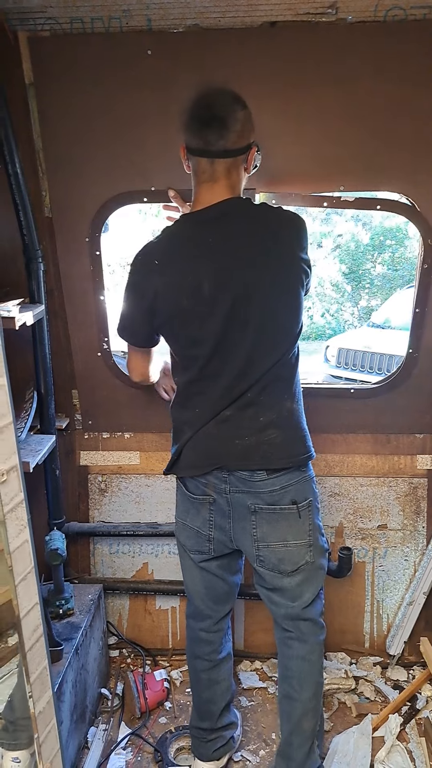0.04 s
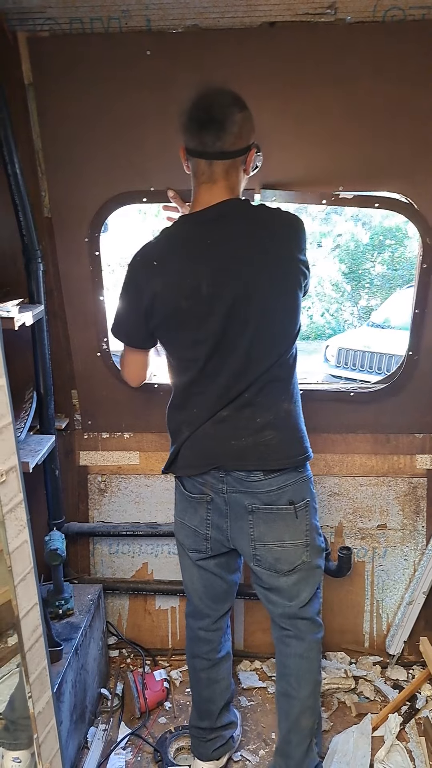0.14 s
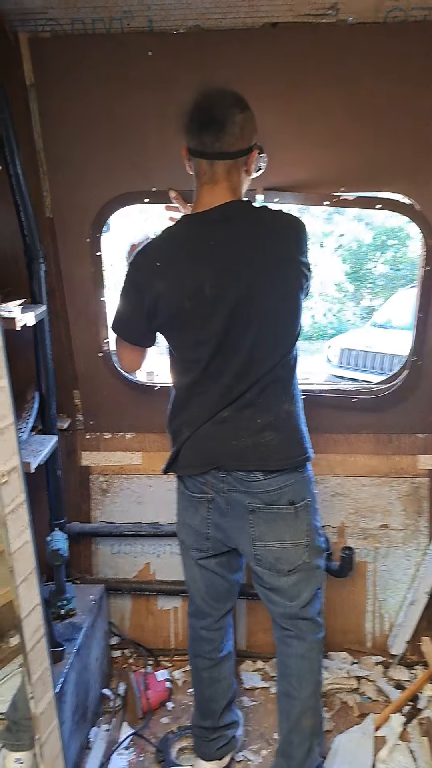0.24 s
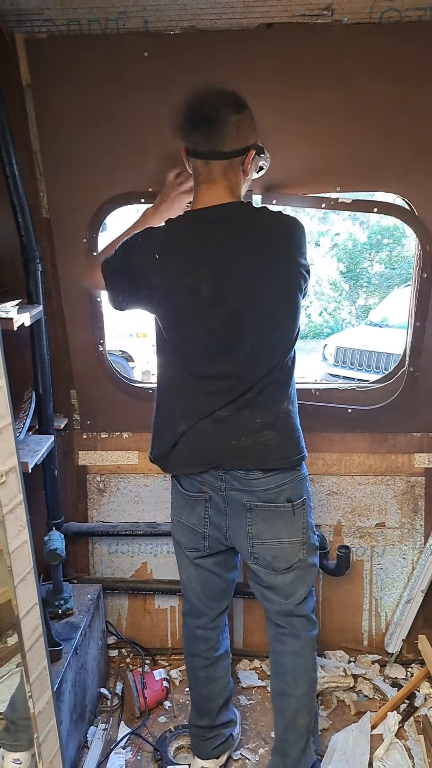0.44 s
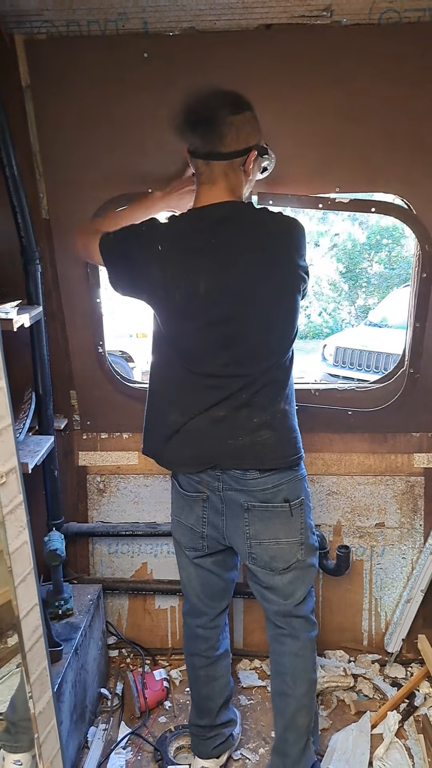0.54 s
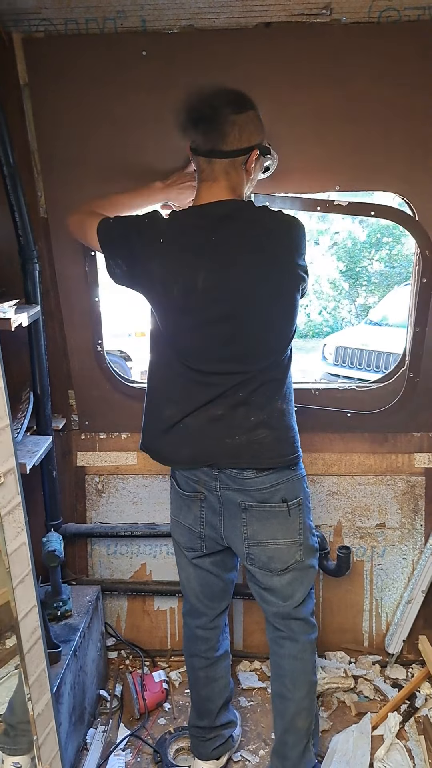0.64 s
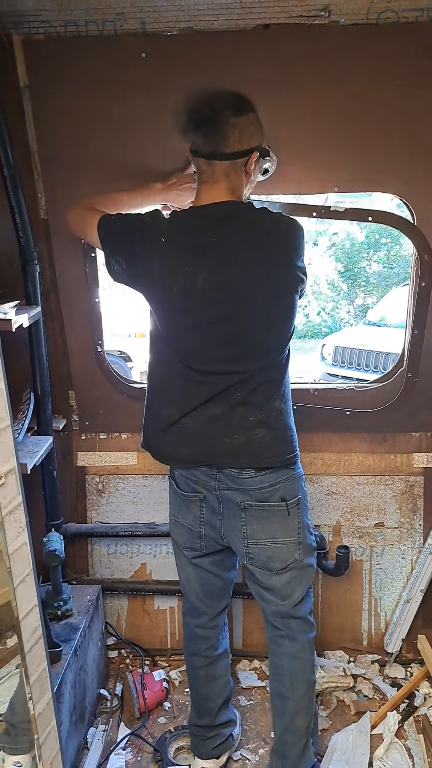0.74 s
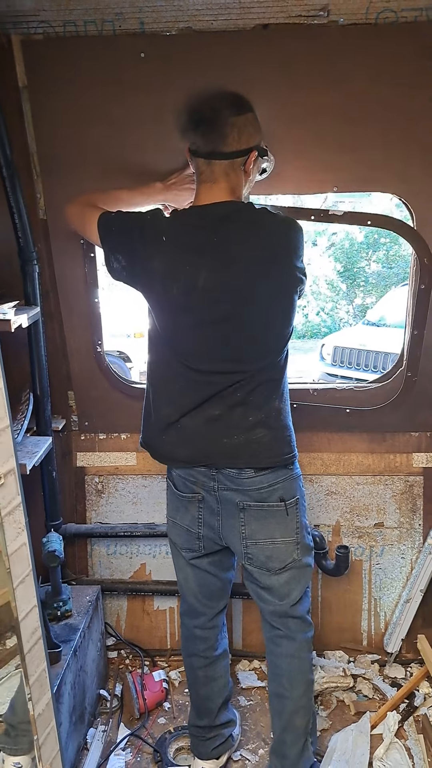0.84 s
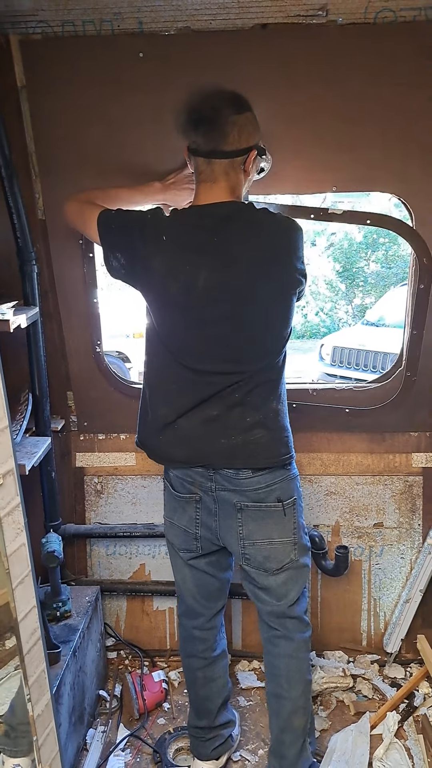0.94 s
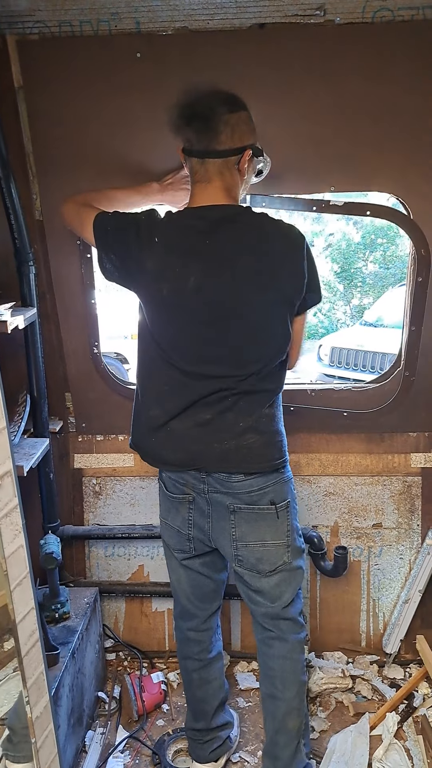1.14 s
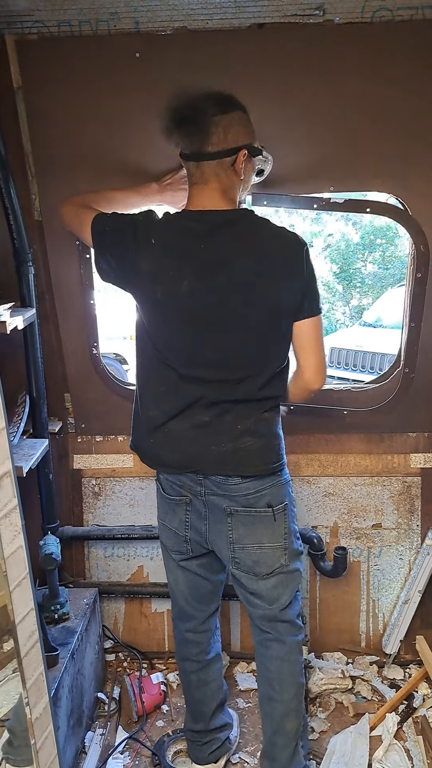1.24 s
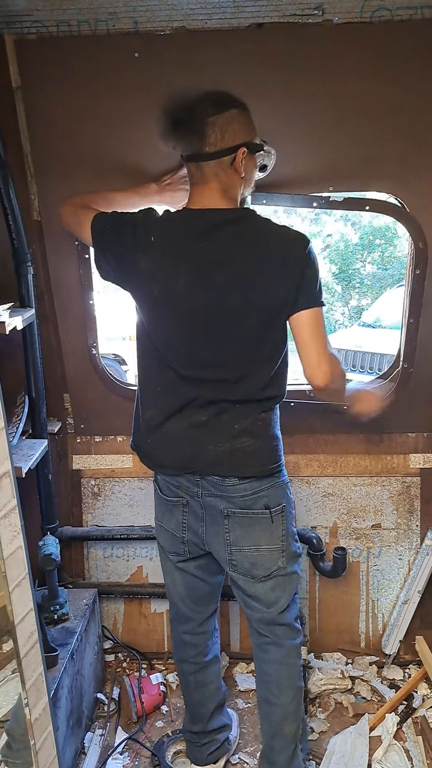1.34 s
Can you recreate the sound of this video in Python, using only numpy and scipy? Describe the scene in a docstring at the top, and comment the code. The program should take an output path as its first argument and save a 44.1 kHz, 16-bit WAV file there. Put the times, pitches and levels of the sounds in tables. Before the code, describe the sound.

A window frame knocks twice against a wooden wall, then a hand rubs the panel.

```python
"""A window frame knocks twice, dull and then sharp, as it is pushed into a wood-panelled wall.
Each impact excites damped normal modes: the panel booms and the metal frame rings on,
while the wall and the small bare room reverberate. A hand then rubs along the panel;
sliding friction makes a hiss, and the panel shudders and briefly sings.
A few small ticks of the settling frame sound over the quiet air of the room."""
import sys
import numpy as np
from scipy import signal
from scipy.fft import rfft, irfft
from scipy.io import wavfile

SR = 44100
rng = np.random.default_rng(int(sys.argv[2]) if len(sys.argv) > 2 else 0)


def waveform_to_disk(signal):
    """Save audio, clipped to [-1, 1], as 16-bit WAV at the path in sys.argv[1]."""
    frames = np.transpose(np.atleast_2d(signal))
    scaled = np.clip(frames, -1, 1) * 32767
    samples = np.round(scaled).astype(np.int16)
    wavfile.write(sys.argv[1], SR, samples)


N = 61739
TIME = np.arange(N) / SR
HZ = np.fft.rfftfreq(N, 1 / SR)
PANEL_SPREAD_RAD, PANEL_PAN_DB = 0.18, -1

# Stereo balance of the impacts and of the quieter noises: (frequency [Hz], left minus right [dB])
IMPACT_PAN = [(60, 2.5), (120, 2.5), (260, -3), (450, -4.5), (700, -4), (2000, -5), (4500, 1), (6300, -2),
              (8000, -11), (12000, 11.5), (16000, -4.5)]
QUIET_PAN = [(60, -2), (250, 0), (1000, -3.5), (3000, -0.5), (5500, 1.5), (7500, -14), (10000, 8),
             (16000, 2.5)]


def amp(db):
    """Amplitude ratio of a level in decibels."""
    return 10 ** (np.asarray(db) / 20)


def unit(x):
    """Normalisation to rms 1."""
    return x / np.sqrt(np.mean(x ** 2) + 1e-20)


def spectrum(points):
    """Interpolation of a table over logarithmic frequency."""
    hz, value = np.transpose(points)
    return np.interp(np.log(HZ + 1), np.log(hz + 1), value)


def contour(points):
    """Linear interpolation of a table over time."""
    return np.interp(TIME, *np.transpose(points))


def sides(pan_db):
    """Left and right gains for an interchannel level difference."""
    return amp(np.array([[.5], [-.5]]) * pan_db)


def wander(seconds):
    """Random fluctuation of rms 1: noise low-passed at 1 / seconds."""
    return unit(irfft(rfft(rng.standard_normal(N)) / (1 + (HZ * seconds) ** 2), N))


def add(mix, onset_s, sound):
    """Superposition of a delayed sound on the mix."""
    start = max(round(onset_s * SR), 0)
    mix[:, start:] += sound[:, :N - start]


def noise(colour_db, pan):
    """Random-phase stereo noise of rms 1, coherent between channels only at long wavelengths."""
    # Interchannel coherence, before clipping to 1: (frequency [Hz], coherence [ratio])
    likeness = [(40, 1.4), (120, 1.1), (250, 0.8), (500, 0.37), (1000, 0.12), (2000, 0), (5000, 0),
                (16000, 0)]
    coherence = np.clip(spectrum(likeness), -1, 1)
    phasors = np.exp(2j * np.pi * rng.random((2, len(HZ))))
    mid, side = phasors[0] * np.sqrt(1 + coherence), phasors[1] * np.sqrt(1 - coherence)
    channels = np.array([mid + side, mid - side])
    return unit(irfft(channels * amp(colour_db) * sides(spectrum(pan)), N))


def room_ripple(depth_db=4, spacing_hz=44.87, corner_hz=1400):
    """Interference in the room leaves random treble peaks and dips, in dB for each channel."""
    bins = np.arange(len(HZ))
    peaks = [np.interp(HZ / spacing_hz, bins, rng.standard_normal(len(HZ))) for _ in range(2)]
    return depth_db * HZ ** 2 / (HZ ** 2 + corner_hz ** 2) * np.array(peaks)


def ring(rise_s, t60):
    """Envelope of a damped resonance: build-up, then exponential decay by 60 dB in t60 seconds."""
    return (1 - np.exp(-TIME / rise_s)) * np.exp(-np.log(1000) * TIME / t60)


def modes(table, rise_s, spread_rad, pan_db):
    """Normal modes: damped sinusoids, each reaching the two channels in different phase."""
    out = np.zeros((2, N))
    for hz, db, t60 in table:
        phase = np.array([[1], [-1]]) * spread_rad * rng.uniform(.5, 1) * rng.choice([-1, 1])
        out += amp(db) * ring(rise_s, t60) * np.sin(2 * np.pi * hz * TIME + phase)
    return out * sides(pan_db)


def struck(table, hardness):
    """Modal excitation: the hardness of a blow sets each mode between its soft and hard level."""
    return [(hz, soft + hardness * (hard - soft), t60) for hz, soft, hard, t60 in table]


def knocks():
    """Impulse response: each blow excites diffuse reverberation and the modes of panel and frame."""
    # Impacts: (time [s], reverberation level [dB], hardness [0-1], modal level [dB])
    blows = [(0.2449, -25.5, 0.17, -31.5), (.329, -26, 0.98, -44.5), (0.3326, -20.5, 0.94, -31)]
    # Spectra of a soft and of a hard blow: (frequency [Hz], level [dB])
    dull = [(30, -28), (60, -16), (130, -10), (240, -1), (400, -3), (490, -1), (600, -5), (700, 2.5),
            (850, -4), (1050, -19), (1500, -17), (2400, -12), (3400, -22), (5000, -23.5), (7200, -16.5),
            (9200, -37), (13000, -46), (16000, -57.5)]
    sharp = [(30, -24), (60, -3), (130, -7), (270, -11), (390, -0.5), (490, -3.5), (700, -4), (850, -4.5),
             (1150, -18), (1700, -13.5), (2000, -10), (2600, -5.5), (3500, -9), (5400, -6.5), (5950, -11.5),
             (6500, -7), (7400, -5.5), (8300, -12), (9200, -18.5), (11600, -16), (16000, -22)]
    # Reverberant bands of wall and room: (frequency [Hz], build-up [s], t60 [s])
    wall_bands = [(49.9, 0.072, .9), (124, 0.0075, 0.89), (300, 0.002, 0.51), (649, 0.011, 0.19),
                  (1290, 0.0028, 0.44), (2410, 0.0014, 0.24), (4960, 0.0023, 0.19), (8000, 0.0025, 0.18),
                  (15000, .0015, 0.17)]
    # Modes of wood and metal: (frequency [Hz], soft-blow level [dB], hard-blow level [dB], t60 [s])
    panel_modes = [(55.4, -7, -5, 0.746), (110.4, -14.5, -12.5, 0.72), (125, 2.5, -17, 0.64),
                   (160.4, -6, -4, .3), (233.1, 6.5, -1, 0.23), (292.5, -4, -5.5, 0.24),
                   (368, 4, -12, 0.24), (383.7, -3, -5, .3), (405.3, -13.5, -2.5, .4),
                   (439, -3, -1.5, 0.48), (529, -7, -4, 0.2), (565.5, -15, -10.5, 0.6),
                   (680.8, 3.5, 6, 0.12), (690.7, 1.5, 4, 0.16), (727.8, 9, -5, 0.12),
                   (799.3, -4.5, -8, 0.22), (840, -10, -18, 0.24)]
    frame_modes = [(1084, -28.5, -18.5, 1.3), (1211, -17.5, -13, 1.74), (1405, -21, -9, .82),
                   (1450, -21.5, -8.5, 0.59), (1545, -17, -14.5, 1.5), (1710, -10.5, -19, .28),
                   (1906, -19, -11, .22), (1955, -20, -4, 0.36), (2392, -13, 0.5, .25),
                   (2445, -11.5, -10.5, .22), (2840, -19.5, -4.5, 0.218), (3208, -22, -12, .21),
                   (4270, -22, 1.5, 0.196), (4740, -21.5, -5.5, 0.14), (6620, -20, -3.5, .15),
                   (7390, -17.5, 0, 0.19)]
    out, ripple_db = np.zeros((2, N)), room_ripple()
    centres_hz = [hz for hz, _, _ in wall_bands]
    for onset, db, hardness, modes_db in blows:
        colour_db = (1 - hardness) * spectrum(dull) + hardness * spectrum(sharp) + ripple_db
        blow = rfft(noise(colour_db, IMPACT_PAN))
        for (_, rise_s, t60), weights in zip(wall_bands, np.eye(len(wall_bands))):
            band = spectrum(list(zip(centres_hz, weights)))  # overlapping bands that sum to 1
            add(out, onset, amp(db) * irfft(blow * band, N) * ring(rise_s, t60))
        wood = modes(struck(panel_modes, hardness), rise_s=0.0051,
                     spread_rad=PANEL_SPREAD_RAD, pan_db=PANEL_PAN_DB)
        metal = modes(struck(frame_modes, hardness), rise_s=0.0019, spread_rad=1.347, pan_db=-3.5)
        add(out, onset, amp(modes_db) * (wood + metal))
    return out


def cracks(half_width_octaves=0.58):
    """Contact transients: the frame meets the wall at several points within milliseconds."""
    # Contacts: (time [s], level [dB], centre frequency [Hz], time to peak [s])
    contacts = [(0.2446, -29, 600, 0.0014), (0.2448, -41, 4000, 0.00057), (0.2497, -39, 3200, 0.00063),
                (0.2524, -33, 3200, 0.00045), (0.2554, -29, 680, 0.0031), (0.3333, -20, 11000, 0.0004),
                (.334, -29, 720, 0.00078), (.3342, -13.5, 4900, 0.00044), (0.3377, -21, 5450, 0.00046),
                (0.342, -30.5, 700, 0.0046)]
    out = np.zeros((2, N))
    for onset, db, hz, peak_s in contacts:
        colour_db = -6 * (np.log2((HZ + 1) / hz) / half_width_octaves) ** 2
        age = TIME / peak_s
        add(out, onset, amp(db) * noise(colour_db, IMPACT_PAN) * age * np.exp(1 - age))
    return out


def bumps():
    """Free vibration: each soft bump of the settling panel rings in one damped mode."""
    # Bumps: (time [s], level [dB], frequency [Hz], t60 [s])
    soft_impacts = [(0.127, -39, 168.4, .1), (.16, -39.5, 168, 0.12), (.392, -28.5, 255, 0.127),
                    (0.409, -37, 108, 0.38), (0.444, -28.5, 110.4, 0.33), (0.529, -42, 337, 0.2),
                    (.657, -27.5, 265, 0.044), (0.728, -27.5, 256.3, 0.064), (0.736, -44, 324.5, 0.47),
                    (.8, -45, 318, 0.44)]
    out = np.zeros((2, N))
    for onset, db, hz, t60 in soft_impacts:
        bump = modes([(hz, db, t60)], rise_s=0.0043, spread_rad=PANEL_SPREAD_RAD, pan_db=PANEL_PAN_DB)
        add(out, onset, bump)
    return out


def rubbing(start_s=0.544, end_s=1.026, blend_s=0.098):
    """Sliding friction makes a grainy hiss: light brushing, and one firm stroke that brightens."""
    # Friction envelope: (time [s], level [dB])
    hiss_level = [(0, -57), (.11, -56), (.17, -51.5), (.235, -71), (.42, -70), (.465, -51), (.52, -62.5),
                  (.565, -63), (.605, -55.5), (.645, -56.5), (.73, -47), (.81, -44), (.91, -49), (1.0, -60),
                  (1.045, -58.5), (1.1, -73.5), (1.2, -80), (1.3, -73), (1.33, -62.5), (1.4, -81)]
    # Spectra of light and of firm rubbing: (frequency [Hz], level [dB])
    light_colour = [(880, -56.5), (1500, -25), (1900, -26), (3550, -15), (4830, -5.5), (5710, -8.5),
                    (6500, 0), (7690, -2), (9470, -14.5), (12000, -7.5), (16000, -10)]
    firm_colour = [(400, -25), (600, -11.5), (950, -3), (1300, -17), (2000, -7.5), (2800, -11),
                   (4500, -7.5), (5000, 1), (5400, -5.5), (6000, -6.5), (7400, -1.5), (8200, -7.5),
                   (9300, -18.5), (10500, -11.5), (16000, -11)]
    ripple_db = room_ripple()
    stroke = noise(spectrum(firm_colour) + ripple_db, QUIET_PAN)
    treble_hz, rise_db_per_s, rise_centre_s = 9350, 38, .82
    treble = irfft(rfft(stroke) / (1 + (treble_hz / (HZ + 1)) ** 8), N)
    treble_gain = amp(rise_db_per_s * np.clip(TIME - rise_centre_s, -.15, .15))
    stroke = stroke + treble * (treble_gain - 1)
    brushing = noise(spectrum(light_colour) + ripple_db, QUIET_PAN)
    # Equal-power crossfade into the firm stroke and out again
    firmness = np.clip(.5 + np.minimum(TIME - start_s, end_s - TIME) / blend_s, 0, 1)
    hiss = np.sqrt(firmness) * stroke + np.sqrt(1 - firmness) * brushing
    grain_db = 0.85 * wander(seconds=0.00087)
    return hiss * amp(contour(hiss_level) + grain_db)


def pushed_panel(sing_hz=375.5, waver_ratio=0.0083):
    """Forced vibration: under the hand the panel flexes, shudders and sings one wavering note."""
    # Envelopes of slow flexing, shudder and note: (time [s], level [dB])
    flex_level = [(0, -56), (.22, -53.5), (.37, -47.5), (.46, -55), (.55, -42), (.61, -73), (.7, -46),
                  (.85, -56), (.94, -43.5), (1.01, -48.5), (1.08, -46), (1.15, -60), (1.4, -61.5)]
    shudder_level = [(0, -65), (.11, -66), (.135, -52), (.19, -55.5), (.23, -58.5), (.4, -37.5),
                     (.55, -49.5), (.6, -53.5), (.7, -47), (.74, -48), (.84, -46), (.94, -49),
                     (1.08, -56.5), (1.2, -62), (1.4, -65.5)]
    sing_level = [(0, -88.5), (.5, -68.5), (.66, -50.5), (.8, -60), (.92, -51.5), (1.02, -48.5),
                  (1.14, -51), (1.21, -62), (1.4, -73)]
    # Spectra of flexing and shudder: (frequency [Hz], level [dB])
    flex_colour = [(15, -44), (27, -26), (40, 0.5), (58, -3.5), (80, -13), (120, -23), (250, -49)]
    shudder_colour = [(50, -43), (90, -4), (130, 3), (165, -8.5), (230, 0.5), (320, -4), (410, -5.5),
                      (520, -15), (800, -15.5), (1300, -17.5), (3000, -45)]
    flex = amp(contour(flex_level)) * noise(spectrum(flex_colour), QUIET_PAN)
    shudder = amp(contour(shudder_level)) * noise(spectrum(shudder_colour), QUIET_PAN)
    cycles = np.cumsum(sing_hz * (1 + waver_ratio * wander(seconds=0.036))) / SR
    note = amp(contour(sing_level)) * np.sin(2 * np.pi * cycles)
    return flex + shudder + note


def ticks(decay_s=0.0023, tail_s=.02, tail_db=-13.5):
    """The settling frame emits bright transients, each with a short reverberant tail."""
    # Ticks: (time [s], level [dB])
    events = [(0.177, -45), (.475, -46), (1.037, -51), (1.1195, -48), (1.264, -62.5), (1.32, -60)]
    # Spectrum of a tick: (frequency [Hz], level [dB])
    tick_colour = [(1000, -45), (4600, -30), (6000, -4), (7000, 0), (8000, -4.5), (9300, -17), (12000, -9),
                   (16000, -20.5)]
    envelope = np.exp(-TIME / decay_s) + amp(tail_db) * np.exp(-TIME / tail_s)
    out = np.zeros((2, N))
    for onset, db in events:
        add(out, onset, amp(db) * noise(spectrum(tick_colour), QUIET_PAN) * envelope)
    return out


def room_air(level_db=-57):
    """Stationary background noise of the room, strongest in the bass."""
    # Ambient spectrum: (frequency [Hz], level [dB])
    air_colour = [(15, -40.5), (30, -14.5), (60, 2), (110, -4.5), (170, -12), (260, -17.5), (400, -27),
                  (560, -37), (720, -29.5), (810, -15.5), (900, -19.5), (1200, -32.5), (2000, -36.5),
                  (3500, -51), (5500, -43.5), (7300, -39.5), (9300, -48.5), (12000, -40), (16000, -49)]
    return amp(level_db) * noise(spectrum(air_colour), QUIET_PAN)


def scene():
    """Linear superposition of all sources."""
    return knocks() + cracks() + bumps() + rubbing() + pushed_panel() + ticks() + room_air()


def record(dry, cutoff_hz=15850):
    """Band limiting by a linear-phase low-pass filter."""
    lowpass = signal.firwin(255, cutoff_hz, window=("kaiser", 9), fs=SR)
    return signal.oaconvolve(dry, lowpass[None], "same")


dry = scene()
out = record(dry)
waveform_to_disk(out)
```